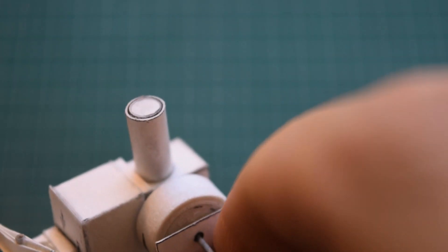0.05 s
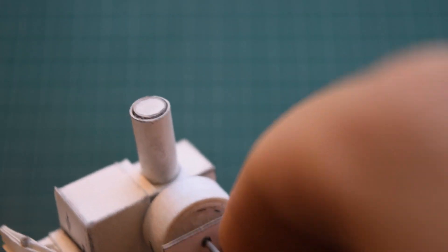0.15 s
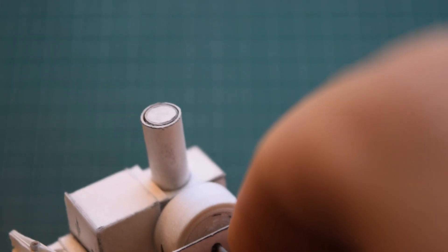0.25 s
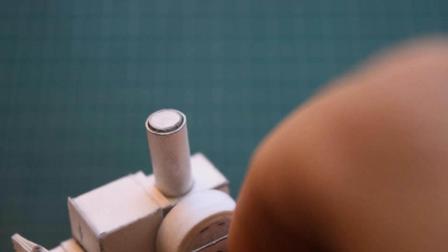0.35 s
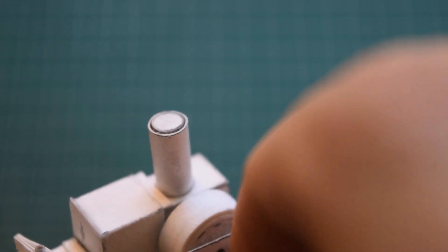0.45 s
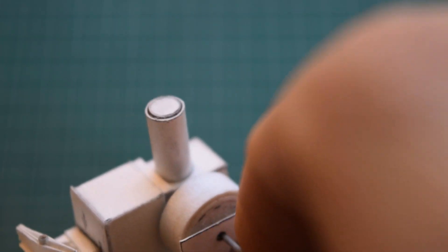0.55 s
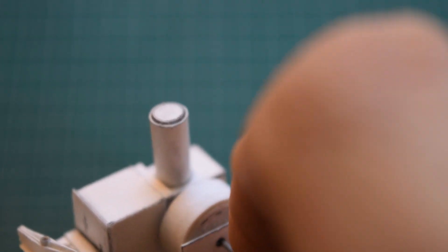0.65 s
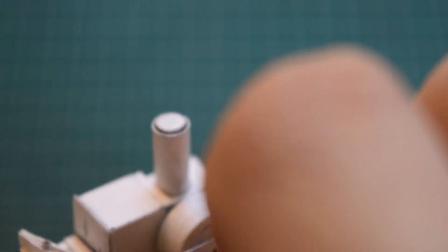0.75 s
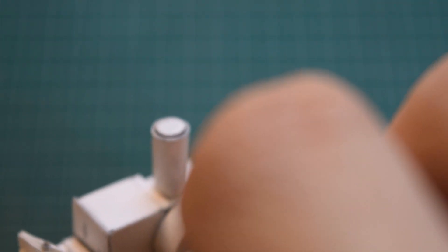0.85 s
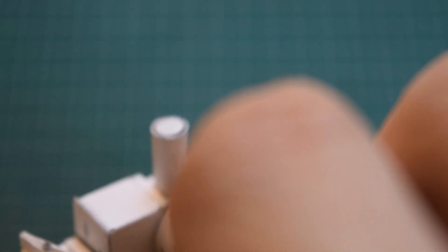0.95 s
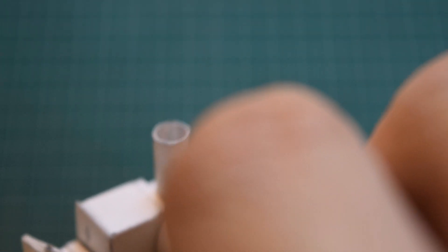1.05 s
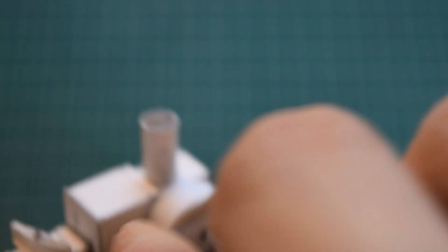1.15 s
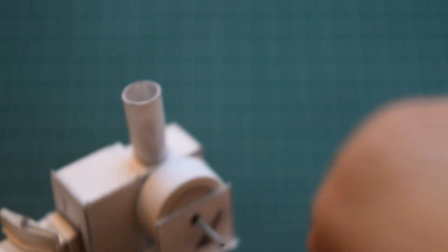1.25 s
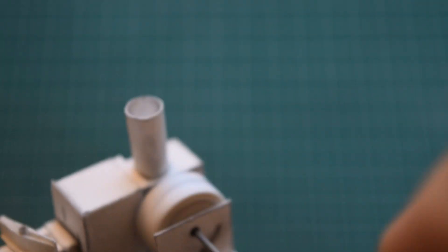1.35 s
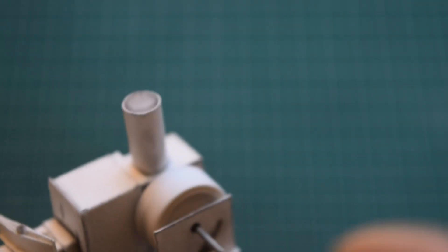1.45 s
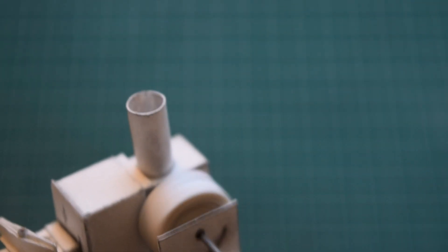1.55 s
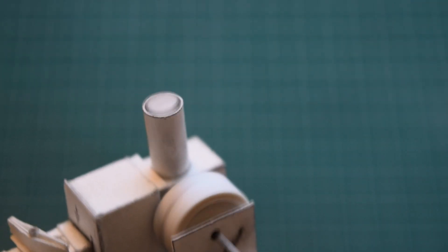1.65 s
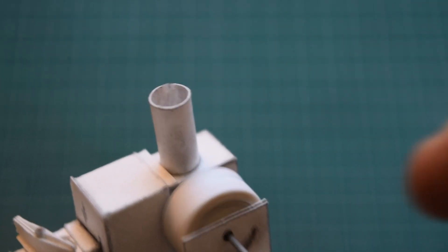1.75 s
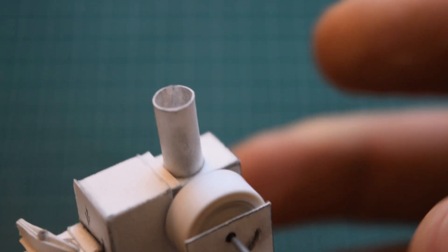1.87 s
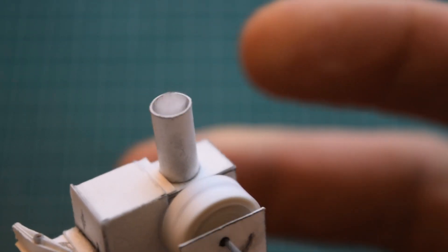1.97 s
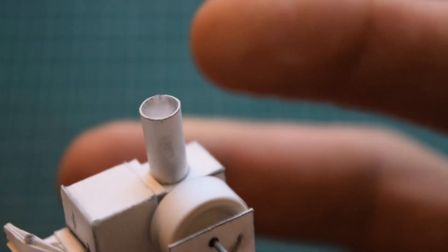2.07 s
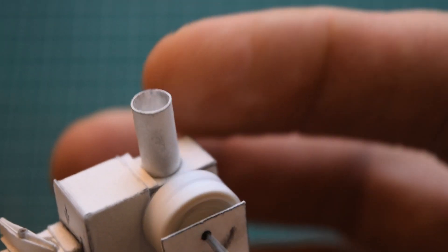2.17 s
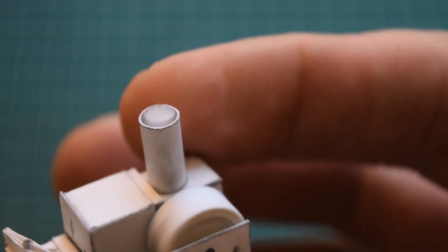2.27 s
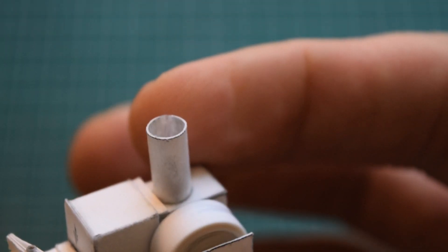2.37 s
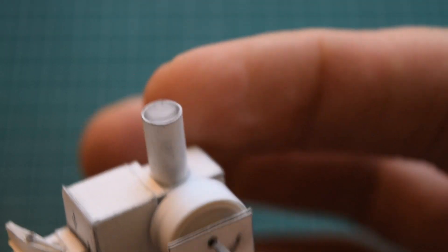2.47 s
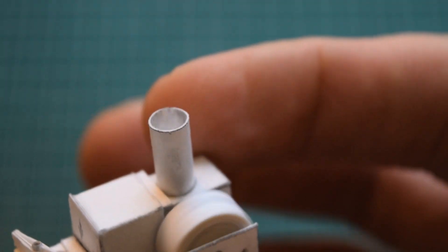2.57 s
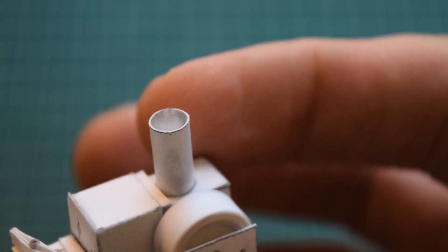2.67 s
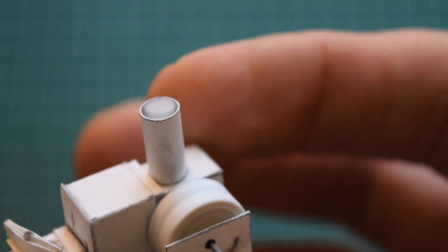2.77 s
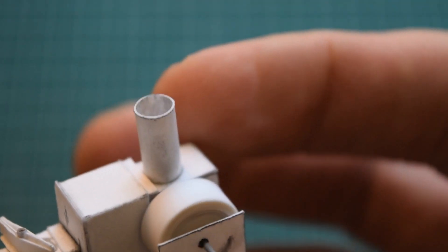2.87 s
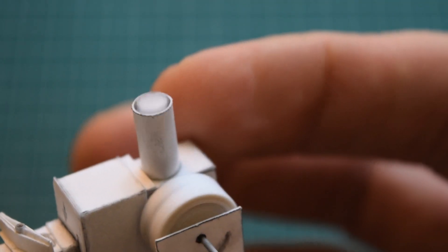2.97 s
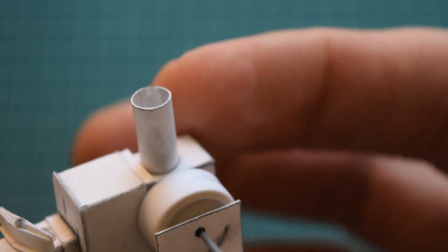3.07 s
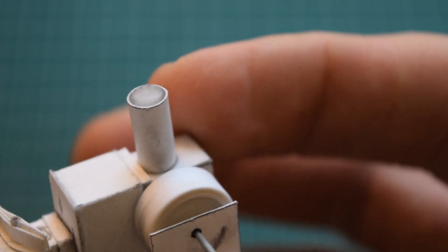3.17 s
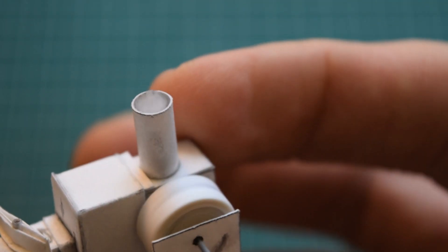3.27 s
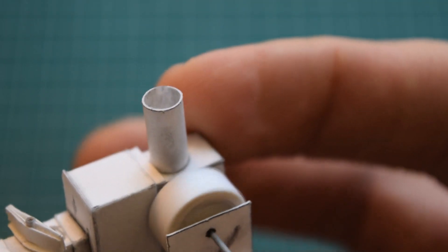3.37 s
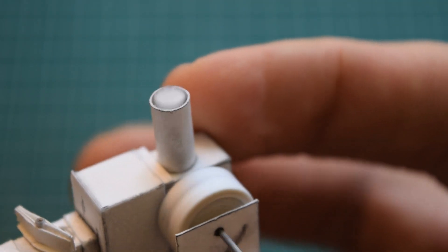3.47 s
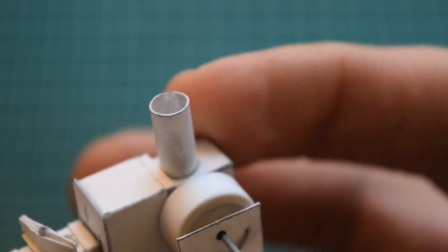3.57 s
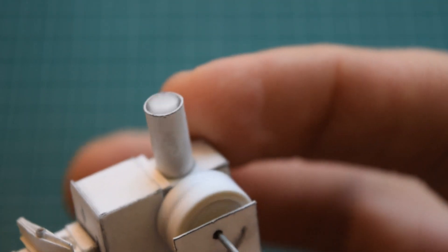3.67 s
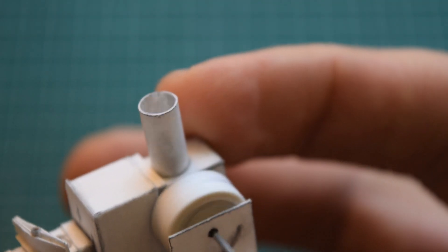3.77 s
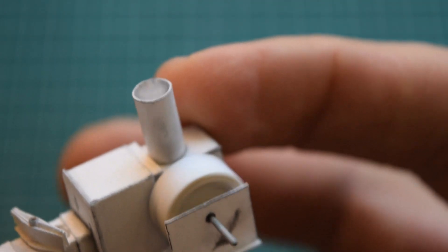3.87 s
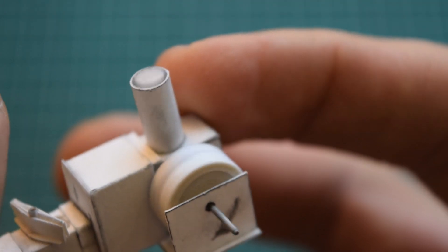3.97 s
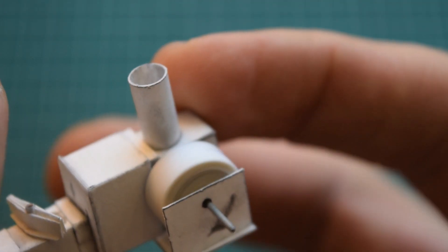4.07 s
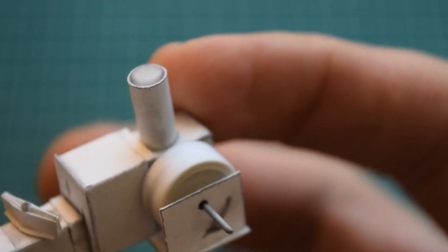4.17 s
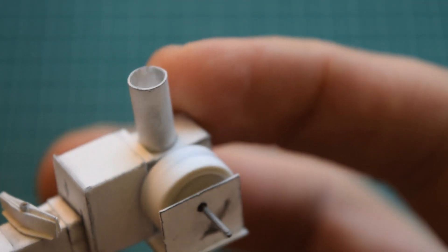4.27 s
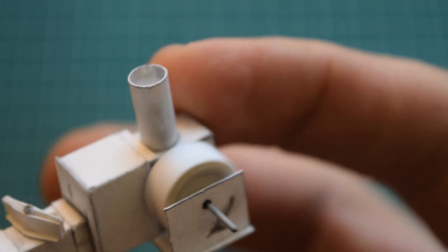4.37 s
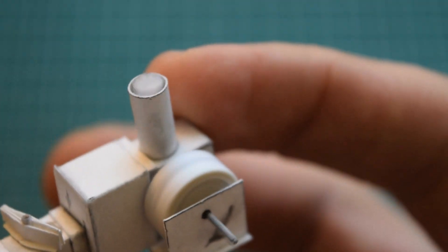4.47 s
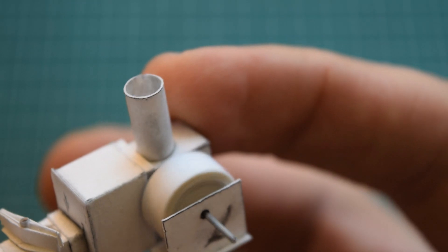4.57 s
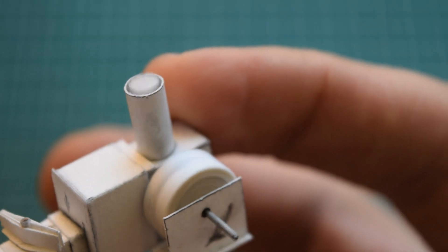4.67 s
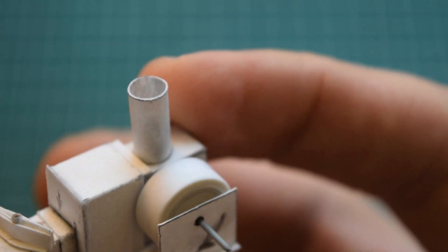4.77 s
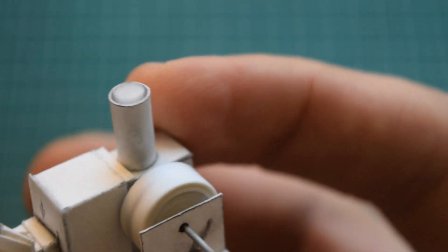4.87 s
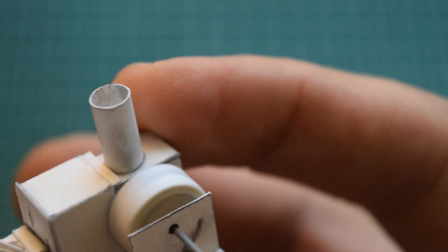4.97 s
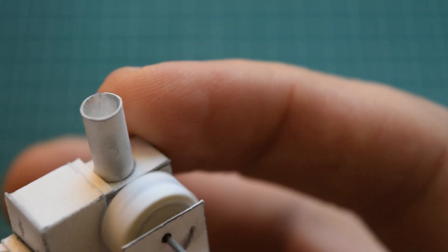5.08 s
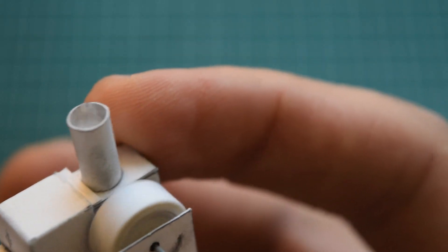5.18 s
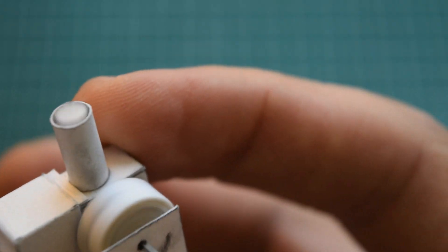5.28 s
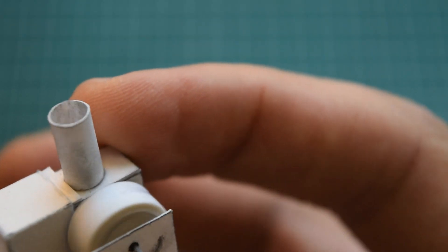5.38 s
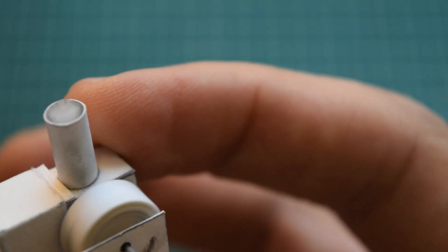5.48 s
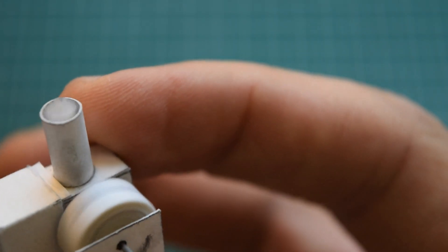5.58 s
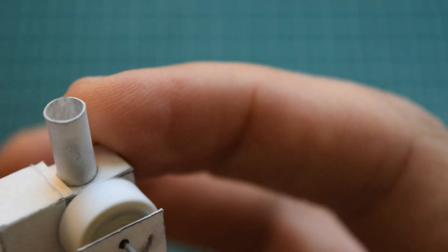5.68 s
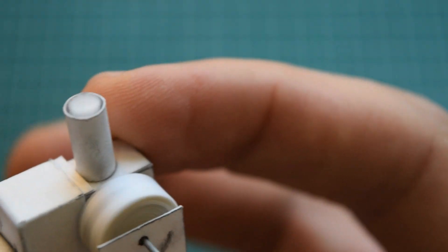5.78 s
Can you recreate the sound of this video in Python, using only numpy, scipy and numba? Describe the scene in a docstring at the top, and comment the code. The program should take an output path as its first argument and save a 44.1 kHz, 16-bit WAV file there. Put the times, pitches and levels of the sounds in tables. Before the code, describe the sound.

Soft air hiss and faint finger touches, then a tiny paper motor bursts into a fast dry rattling buzz that runs on steadily.

```python
"""Paper piston motor on an air line

A thumb-sized paper motor runs close to the microphone in a small room. Air hisses softly throughout; after
a second a finger flicks the flywheel and the motor rattles on at about 34 turns a second. In each turn a valve
thumps open and shut, the linkage snaps, the piston knocks and scrapes along its tube, ringing the card frame,
and a puff of air escapes past a fluttering paper edge. Clicks and noise, filtered, make all but the flutter."""
import sys
import numpy as np
from scipy import signal
from scipy.fft import rfft, irfft
from scipy.io import wavfile
from scipy.ndimage import uniform_filter1d
from numba import njit

SR = 44100
rng = np.random.default_rng(int(sys.argv[2]) if len(sys.argv) > 2 else 0)


def wav_out(sig):
    """Save sig, one row per channel (or a flat mono array), as 16-bit PCM at SR to the path in sys.argv[1]."""
    wavfile.write(sys.argv[1], SR, np.round(np.clip(np.atleast_2d(sig).T, -1, 1) * 32767).astype(np.int16))


N = 257103
TIME = np.arange(N) / SR
START_S = 1.1025  # the motor starts to turn

# How the panels ring up as the motor settles and rise in pitch as fingers hold them,
# while the ring of the air gap fades: time_s, panel_pitch_ratio, panel_level_db, gap_ring_change_db
HELD_PANELS = [(1.1, 0.94, -12, -2), (1.7, 0.95, 2, 0), (3.2, 0.988, 1.5, 0.5), (4.6, 1.045, 4.5, -5.5),
               (5.2, 1.055, 4.5, -25), (5.8, 1.11, 2.5, -23)]
# level of the motor's parts as it starts, and how it creeps up while it runs
MOTOR_DB, CREEP_DB_PER_S = -25, 0.21
# air dammed up in the line makes the first puffs stronger
BLAST_DB, BLAST_DECAY_S = 1.5, 0.37


def motor(body_db=-2, flap_db=-5, thump_db=-11.0, snap_db=-7, air_db=-7.0, room_db=-10, flex=0.0092):
    """Valve thump, linkage snap, piston rattle, paper flutter and air puffs, all timed by the crank."""
    running = np.maximum(TIME - START_S, 0)
    level_db = MOTOR_DB + CREEP_DB_PER_S * running
    stretch, panel_db, whistle_db = curves(HELD_PANELS)
    starts, pace, turn, age = crank()
    thump = undb(thump_db) * valve(starts, pace)
    snap = undb(snap_db) * linkage(starts, stretch)
    # each turn bends the frame a little, which shifts its pitch
    flexing = 1 + flex * rng.standard_normal(len(starts))[turn]
    knocks_and_scrape = piston(starts, pace, age)
    rattle = undb(body_db) * frame(knocks_and_scrape, stretch, panel_db, flexing)
    flutter = undb(flap_db) * flap(turn, age, starts)
    puff_db = air_db + BLAST_DB * np.exp(-running / BLAST_DECAY_S)
    air = undb(puff_db) * exhaust(turn, age, whistle_db)
    direct = undb(level_db) * (thump + snap + rattle + flutter + air)
    return direct + undb(room_db) * room(direct.mean(axis=0))


# Cruising speed of the crank: time_s, speed_turns_per_s
CRUISING_SPEED = [(1.1, 35.699), (2.33, 35.361), (2.43, 34.491), (3.38, 34.024), (3.62, 34.801),
                  (3.8, 33.679), (4.41, 34.087), (4.6, 34.851), (4.93, 33.639), (5.83, 34.015)]
# the flick spins the flywheel up to this much faster; the surplus then dies away through friction
FLICK_TURNS_PER_S, FLICK_RISE_S, FLICK_DECAY_S = 39.43, .0165, .048


def crank():
    """Start and pace of every turn, and the time since the last start; a fast turn squeezes its stroke."""
    cruise, = curves(CRUISING_SPEED)
    running = np.maximum(TIME - START_S, 0)
    flick_rise = running / FLICK_RISE_S
    flick_decay = np.exp((FLICK_RISE_S - running) / FLICK_DECAY_S)
    speed = cruise + FLICK_TURNS_PER_S * np.minimum(flick_rise, flick_decay)
    turns = np.cumsum(speed * (TIME >= START_S)) / SR
    # a turn starts whenever the count passes a whole number
    starts = TIME[np.searchsorted(turns, np.arange(int(turns[-1]) + 1), side="right")]
    starts = starts + .00004 * rng.standard_normal(len(starts))  # timing scatter in seconds
    pace = (np.interp(starts, TIME, speed) / np.median(speed)) ** .75
    turn = np.maximum(np.searchsorted(starts, TIME, side="right") - 1, 0)  # number of the current turn
    age = (TIME - starts[turn]) * pace[turn]
    return starts, pace, turn, age


# Colour of the air thump when the valve opens or shuts: pitch_hz, level_db
THUMP_COLOUR = [(60, -51.5), (130, -26), (220, -20.5), (310, -12.5), (360, -20), (420, -3), (500, -7.5),
                (620, 2), (850, 6), (1100, -3), (1600, -10.5), (4000, -79.5)]


def valve(starts, pace):
    """The air flow jumps on and, two fifths of a turn later, off: a push and a pull that give the low buzz."""
    open_and_shut_s = np.array([.0006, .01205])
    edges = starts[:, None] + open_and_shut_s / pace[:, None]
    sizes = np.array([1, -1]) * undb(.7 * rng.standard_normal(edges.shape))
    return unit(colour(clicks(edges, sizes), THUMP_COLOUR))


# Colour of the sharp snap of the linkage: pitch_hz, level_db
SNAP_COLOUR = [(200, -78), (900, -10), (1500, 15.5), (1900, 5), (2800, -2.5), (3800, 1.5), (5500, -9.5),
               (10000, -8), (16000, -2)]


def linkage(starts, stretch, bounce_s=0.00158, bounce_db=0, scatter_db=2, panel_db=0):
    """The pressure takes up the slack in the linkage with a snap and one bounce."""
    chance = rng.standard_normal((len(starts), 2, 2))
    times = starts[:, None] + 0.00027 + np.array([0, bounce_s]) + .00006 * chance[:, 0]
    sizes = undb(np.array([0, bounce_db]) + scatter_db * chance[:, 1])
    snap = colour(clicks(times, sizes), SNAP_COLOUR)
    # card is too soft for a glassy top
    snap = signal.sosfilt(signal.butter(3, 8500, fs=SR, output="sos"), snap)
    return unit(snap + undb(panel_db) * modes(snap, PANEL_RINGS, stretch))


# Knocks of the piston in each turn, timed from the start of the turn at normal pace:
# delay_s, level_db, timing_scatter_s, level_scatter_db
PISTON_KNOCKS = [(.0017, -9, 0.000057, -0.5), (.0048, -6.5, 0.000078, 3), (.0069, -13, 0.00017, 3.5),
                 (.0089, -3.5, .00009, 0), (0.0102, -4.5, .00009, -1)]


def piston(starts, pace, age, scrape_db=0.0):
    """The loose piston knocks at nearly the same places in every turn and scrapes the paper in between."""
    delay, db, scatter, scatter_db = np.transpose(PISTON_KNOCKS)
    chance = rng.standard_normal((len(starts), 2, len(delay)))
    times = starts[:, None] + delay / pace[:, None] + scatter * chance[:, 0]
    knocks = clicks(times, undb(db + scatter_db * chance[:, 1]))
    # paper is soft: the blows carry little treble
    knocks = colour(knocks, [(2500, 0), (4500, -3.5), (9000, -5.5)])
    # the scrape is a shower of tiny clicks from fibres, about 5000 a second before gating
    caught = rng.random(N) < 5000 / SR
    fibres = caught * rng.choice([-1, 1], N) * undb(3 * rng.standard_normal(N))
    scrape = colour(fibres, [(250, -19.5), (750, -3), (1100, -4.5), (3000, 3), (6000, -2.5), (12000, -6.5)])
    sliding = gate(age, opens=0.0021, rise=0.0022, closes=0.017, fall=0.0027)
    scrape = scrape * sliding * (TIME >= START_S)
    return unit(knocks) + undb(scrape_db) * unit(scrape)


# Broad colour of a paper tap: pitch_hz, level_db
PAPER_COLOUR = [(60, -74.5), (300, -16.5), (500, -17.5), (700, -8.5), (1000, 2.5), (1400, -1.5), (2000, -3),
                (3000, -7.5), (4500, -31), (7000, -39), (9500, 0.5), (12000, -14.5), (16000, -31)]
# Ringing notes of the card frame: pitch_hz, width_hz, level_db
FRAME_RINGS = [(575, 89, 11), (868, 30, 9.5), (976, 16, 8), (1130, 72, 11.5), (1325, 48, 2),
               (1570, 74, 6.5), (2090, 160, -3), (3326, 24, 7.5), (3743, 84, 16.5)]
# Ringing notes of the panels under the fingers, before the hold shifts them: pitch_hz, width_hz, level_db
PANEL_RINGS = [(1745, 190, 4), (2184, 137, -1.5), (2583, 115, 1.5)]


def frame(force, stretch, panel_db, flex, tap_db=-8):
    """Every contact gives a dry paper tap and rings the frame and its held panels, which flex from turn to turn."""
    tap = colour(force, PAPER_COLOUR)
    frame_ring = modes(tap, FRAME_RINGS, flex)
    panel_ring = undb(panel_db) * modes(tap, PANEL_RINGS, stretch * flex)
    return unit(undb(tap_db) * tap + frame_ring + panel_ring)


def flap(turn, age, starts, pitch_hz=1030, scatter=.02, wander=0.057, overtone_db=-13):
    """While the valve is open, a paper edge flutters like a reed in the air, a little differently in each turn."""
    drift = unit(uniform_filter1d(rng.standard_normal(N), size=90))
    hz = pitch_hz * (1 + scatter * rng.standard_normal(len(starts))[turn] + wander * drift)
    cycles = np.cumsum(hz) / SR
    phase = 2 * np.pi * (cycles - np.interp(starts, TIME, cycles)[turn])  # starts afresh in every stroke
    swing = gate(age, opens=0.0034, rise=0.001, closes=0.014, fall=0.0032) * (TIME >= START_S)
    return unit(swing * (np.sin(phase) + undb(overtone_db) * np.cos(2 * phase)))


# Colour of the escaping air: pitch_hz, level_db
PUFF_COLOUR = [(300, -29), (1000, -39.5), (2500, -1), (4200, -3), (5200, -8), (7200, -8.5), (8200, -3.5),
               (9000, -1.5), (9900, -2.5), (10700, -8), (12500, -13), (15800, -23)]
# Ringing notes of the gap around the piston: pitch_hz, width_hz, level_db
GAP_RINGS = [(5490, 83, 0), (6230, 48, -5.5), (7880, 89, -14), (8646, 190, -1), (9180, 190, -4.5),
             (9920, 130, -7)]


def exhaust(turn, age, whistle_db, gap_db=5, scatter_db=1, flutter_db=2):
    """A fluttering puff of air in each stroke, over a steady leak past the piston."""
    leak = undb(-12.5)
    flow = gate(age, opens=.0016, rise=.0028, closes=.0138, fall=.003) + leak
    flutter = unit(uniform_filter1d(rng.standard_normal(N), size=40))
    turn_db = scatter_db * rng.standard_normal(turn[-1] + 1)[turn]
    flow = flow * undb(turn_db + flutter_db * flutter)
    flow = flow * (TIME >= START_S - .004)  # the leak opens just before the first stroke
    jets = [colour(flow * rng.standard_normal(N), PUFF_COLOUR) for _ in range(2)]
    mid, side = (unit(jet + undb(gap_db + whistle_db) * modes(jet, GAP_RINGS)) for jet in jets)
    # left and right differ more in the treble than in the bass
    side = colour(side, [(500, -26), (1100, -18), (2000, -18), (4500, -13.5), (9000, -12), (13000, -3.5)])
    return mid + np.array([side, -side])


# Left-right spread of the reflections: pitch_hz, level_db
REFLECTION_SPREAD = [(200, -15), (750, -23), (1100, -72), (1600, -9.5), (2600, -11), (4000, -2.5),
                     (8000, 2), (14000, -10)]


def room(x, desk_t60=0.23, wall_t60=0.53, wall_db=-16, first_s=0.0031, low_hz=700):
    """Quick reflections from desk and hand, then a faint tail from the walls, both thin in the bass."""
    t = TIME[:SR // 2]
    # each t60 is the time in seconds to die away by 60 dB
    desk = undb(-60 * t / desk_t60)
    walls = undb(wall_db - 60 * t / wall_t60)
    tails = rng.standard_normal((2, len(t))) * (desk + walls) * (t > first_s)
    x = signal.lfilter(*signal.butter(2, low_hz, "high", fs=SR), x)
    mid, side = (convolve(x, tail / np.linalg.norm(tail)) for tail in tails)
    side = colour(side, REFLECTION_SPREAD)
    return mid + np.array([side, -side])


# Fingers touch the motor: middle_s, length_s, pitch_hz, width_hz, level_db
FINGER_TOUCHES = [(.175, .02, 8500, 4000, -64), (.443, .012, 9000, 3500, -58), (.54, .02, 5960, 1300, -57),
                  (.542, .02, 9000, 3500, -61), (.46, 0.033, 590, 150, -55), (.82, 0.037, 610, 129, -53),
                  (.822, 0.017, 333, 100, -57), (4.38, 0.089, 380, 300, -50)]


def fingers():
    """Soft bumps and brief brushes of skin on paper: noise around one pitch that swells and fades."""
    touches = 0
    for middle_s, length_s, hz, width, db in FINGER_TOUCHES:
        swell = np.exp(-2 * ((TIME - middle_s) / length_s) ** 2)
        touches = touches + undb(db) * swell * noise_band(hz, width)
    return touches


# Steady hiss of the air supply and the room: pitch_hz, level_db
HISS_COLOUR = [(25, 1), (70, -18.5), (130, -18.5), (250, -20.5), (400, -18.5), (600, -11.5), (700, -14.5),
               (850, -3.5), (1400, -5), (2000, -10.5), (3000, -16), (5000, -25.5), (11000, -26),
               (15500, -32)]
HISS_DB = -49.5
# Steady tones in the background: pitch_hz, width_hz, level_db
HUM_TONES = [(130.3, 8.8, -70), (169.3, 5.5, -77), (518, 36, -65.5), (806, 27, -61.5), (891, 43, -59),
             (1110, 72, -57.5), (1290, 18, -62), (1610, 87, -59.5), (2250, 19, -64), (3425, 90, -69)]


def background(hiss_db=0.0, hum_db=0):
    """The soft hiss of the air supply, with a few wavering tones made from narrow bands of noise."""
    hisses = [unit(colour(rng.standard_normal(N), HISS_COLOUR)) for _ in range(2)]
    mid, side = (undb(HISS_DB + hiss_db) * hiss for hiss in hisses)
    side = colour(side, [(30, -9), (70, -2), (150, -13), (600, -25.5), (2000, -12.5), (5000, -2.0), (12000, -6)])
    hum = sum(undb(db + hum_db) * noise_band(hz, width) for hz, width, db in HUM_TONES)
    return mid + hum + np.array([side, -side])


def undb(db):
    """Decibels to gain."""
    return 10 ** (np.asarray(db) / 20)


def unit(x):
    """Scale to an average strength (rms) of 1."""
    return x / np.sqrt(np.mean(x ** 2))


def curves(table):
    """Each column of a table joined by straight lines in time."""
    s, *columns = np.transpose(table)
    return [np.interp(TIME, s, c) for c in columns]


def convolve(x, response):
    """Play x through an impulse response."""
    return signal.oaconvolve(x, response)[:N]


def colour(x, points, size=4096):
    """Filter with the given (Hz, dB) outline that never sounds ahead of its input."""
    hz, db = np.transpose(points)
    bins = np.maximum(np.arange(size // 2 + 1) * SR / size, 1)
    outline = undb(np.interp(np.log(bins), np.log(hz), db))
    # folding the cepstrum puts the response's energy as early as possible
    cepstrum = irfft(np.log(outline))
    cepstrum[1:size // 2] *= 2
    cepstrum[size // 2 + 1:] = 0
    return convolve(x, irfft(np.exp(rfft(cepstrum))))


@njit
def svf(x, g, k):
    """State-variable band-pass whose centre may move."""
    y, band, low = np.empty(len(x)), 0., 0.
    for i in range(len(x)):
        v = (band + g[i] * (x[i] + 1e-18 - low)) / (1 + g[i] * (g[i] + k))
        band, low, y[i] = 2 * v - band, low + 2 * g[i] * v, k * v
    return y


def ring(x, hz, width, stretch=1):
    """One resonance, gain 1 at its centre."""
    return svf(x, np.tan(np.pi * hz * stretch / SR) * np.ones(N), float(width / hz))


def noise_band(hz, width):
    """Noise through the same resonance twice, scaled to rms 1."""
    return unit(ring(ring(rng.standard_normal(N), hz, width), hz, width))


def modes(x, table, stretch=1):
    """A set of resonances driven together."""
    return sum(undb(db) * ring(x, hz, width, stretch) for hz, width, db in table)


def clicks(times, sizes):
    """A train of single clicks."""
    places = np.maximum(np.round(times.ravel() * SR), 0).astype(int)
    return np.bincount(places, sizes.ravel(), N)[:N]


def gate(age, opens, rise, closes, fall):
    """Opens and shuts once a turn; age is the time since the turn began, scaled by its pace."""
    return (1 + np.tanh((age - opens) / rise)) * (1 - np.tanh((age - closes) / fall)) / 4


def scene():
    """The motor, the hand on it and the steady background."""
    return motor() + fingers() + background()


def record(dry):
    """The recorder cuts the deepest rumble and the top."""
    dry = signal.sosfilt(signal.butter(2, 48, "high", fs=SR, output="sos"), dry)
    return signal.sosfilt(signal.ellip(10, .1, 80, 15800, fs=SR, output="sos"), dry)


dry = scene()
out = record(dry)
wav_out(out)
```